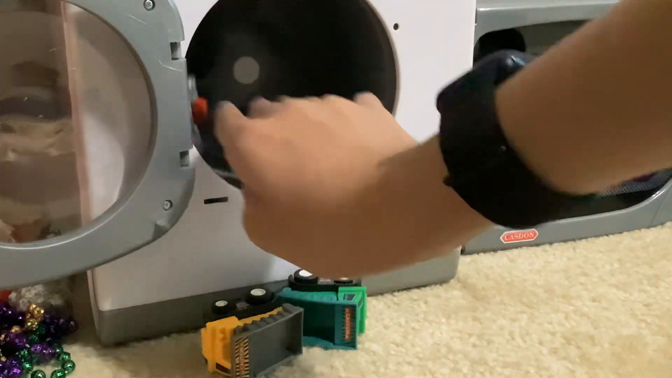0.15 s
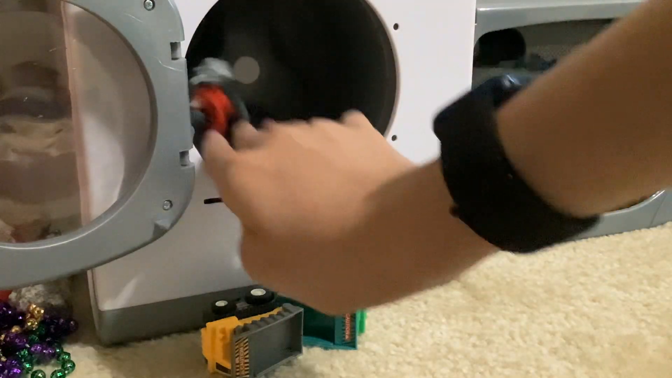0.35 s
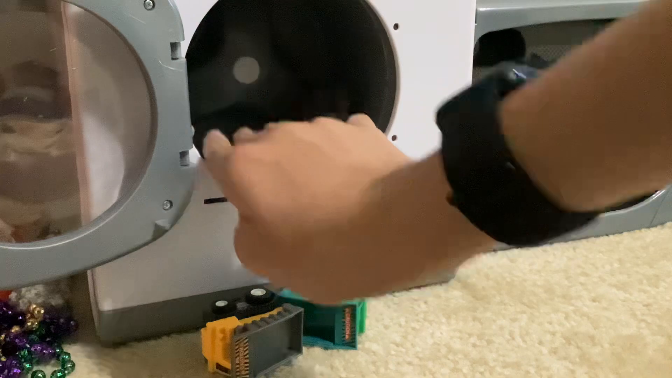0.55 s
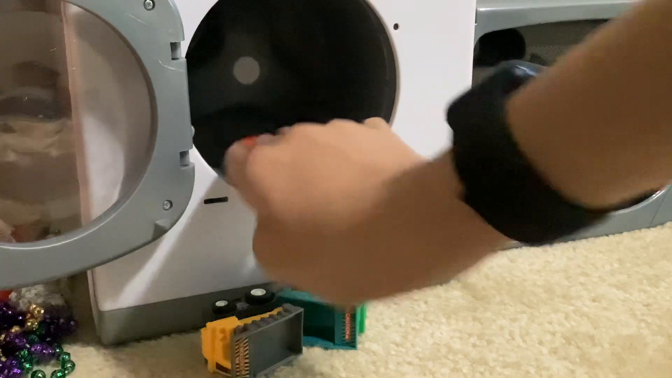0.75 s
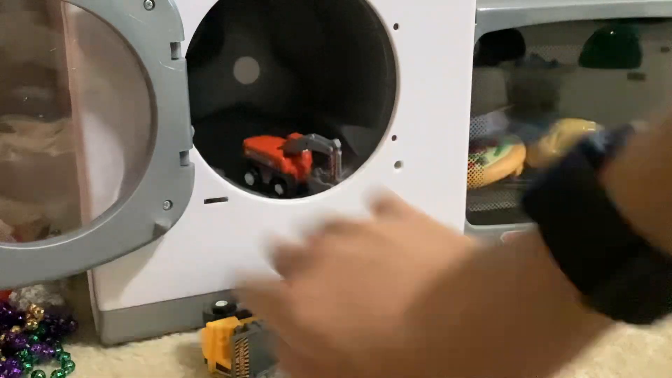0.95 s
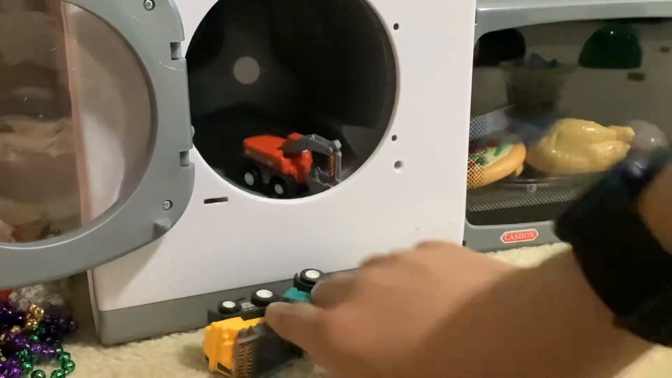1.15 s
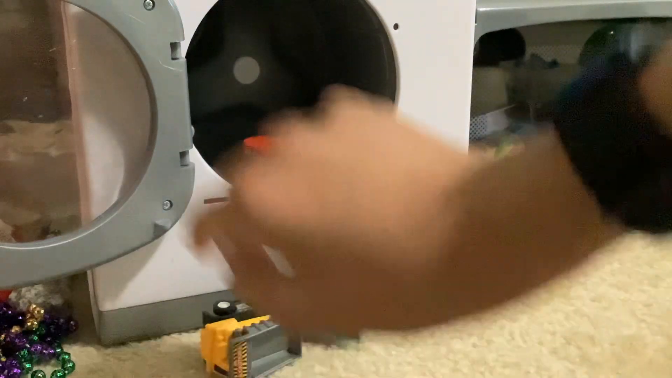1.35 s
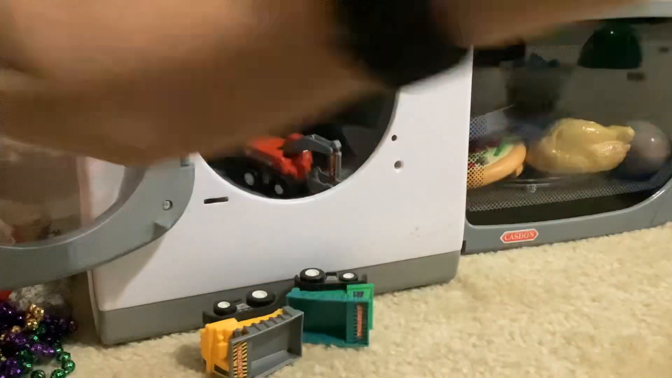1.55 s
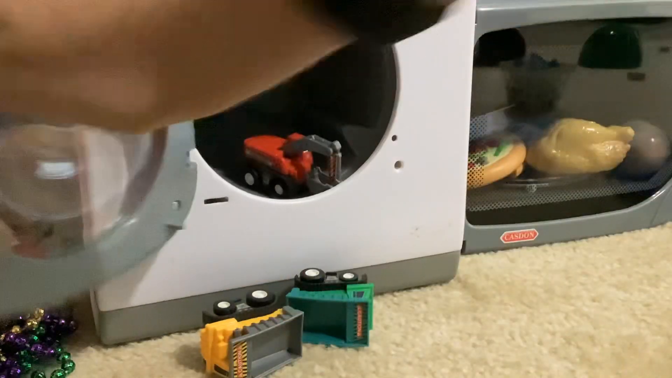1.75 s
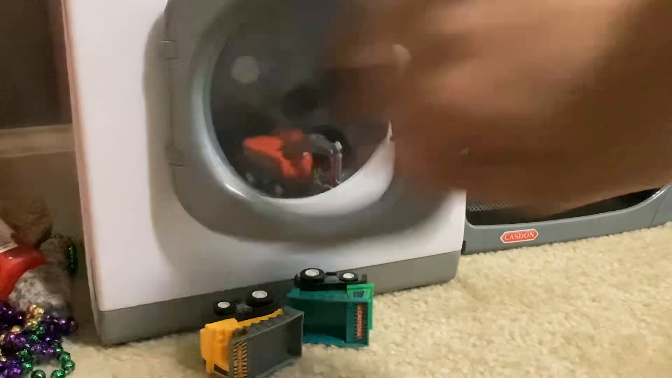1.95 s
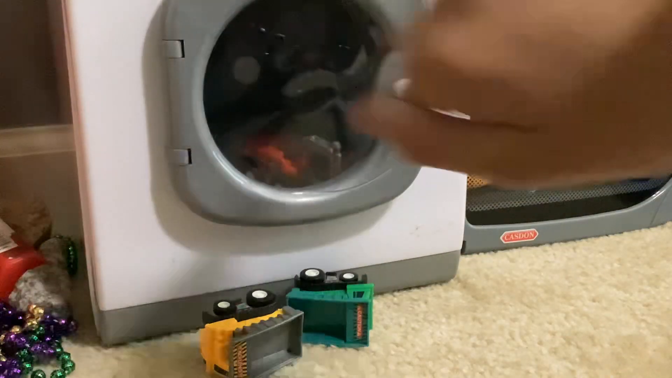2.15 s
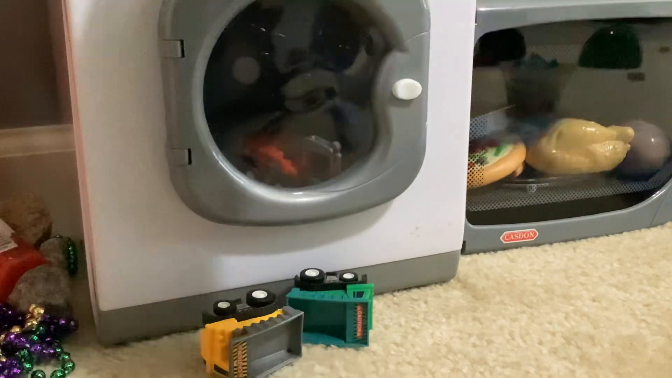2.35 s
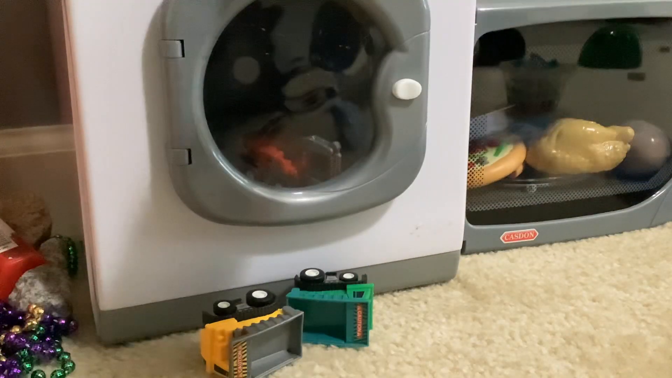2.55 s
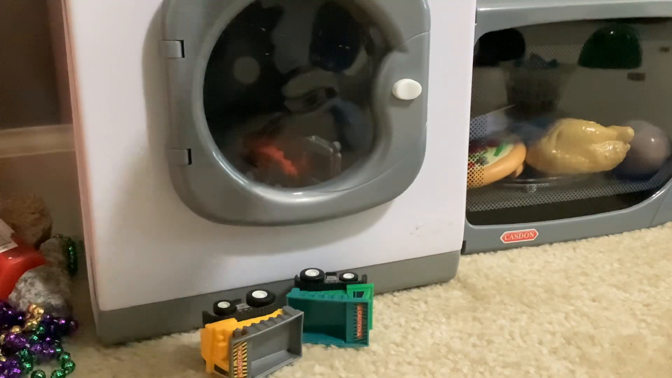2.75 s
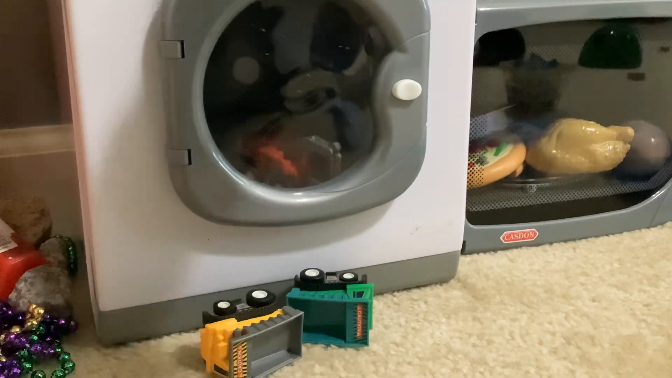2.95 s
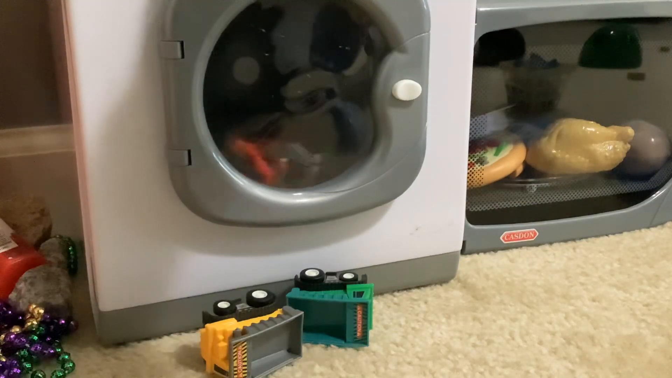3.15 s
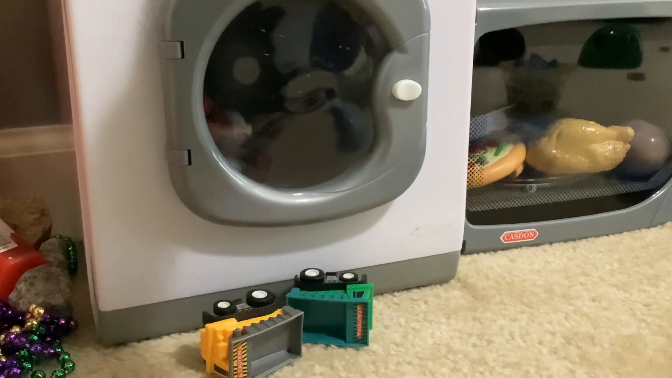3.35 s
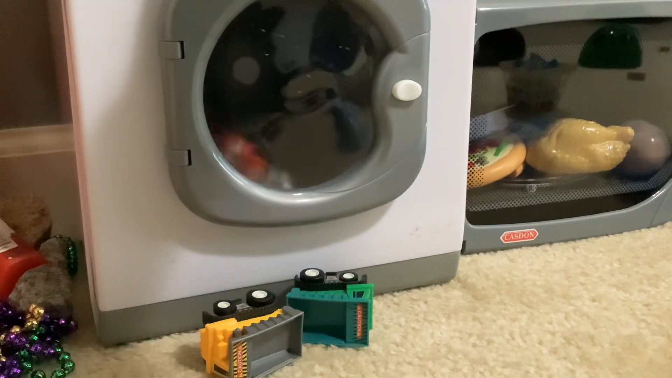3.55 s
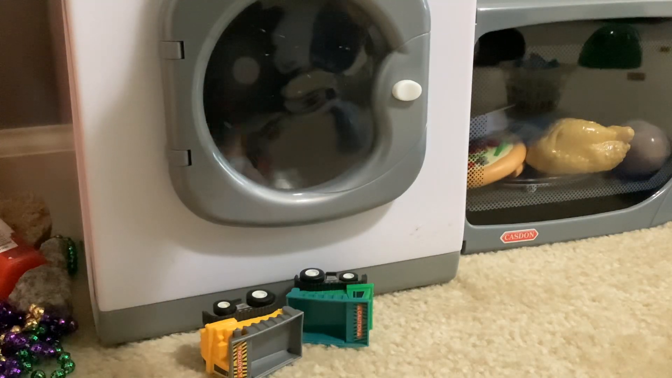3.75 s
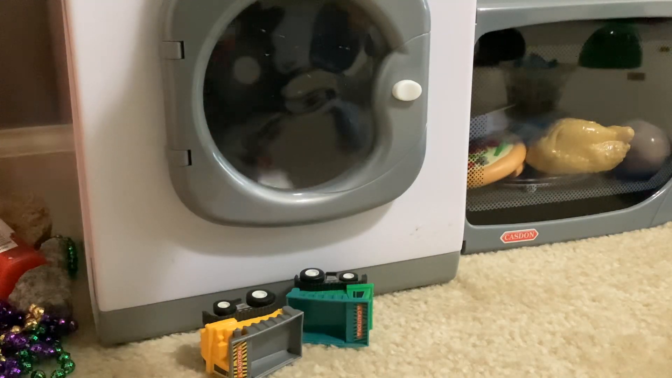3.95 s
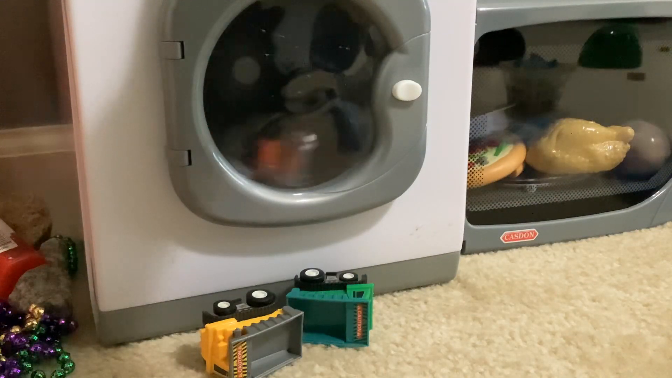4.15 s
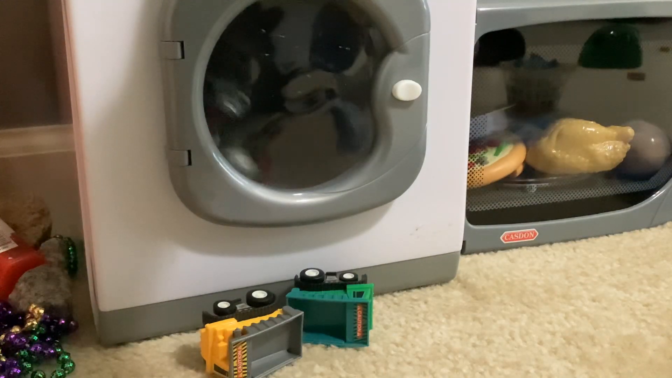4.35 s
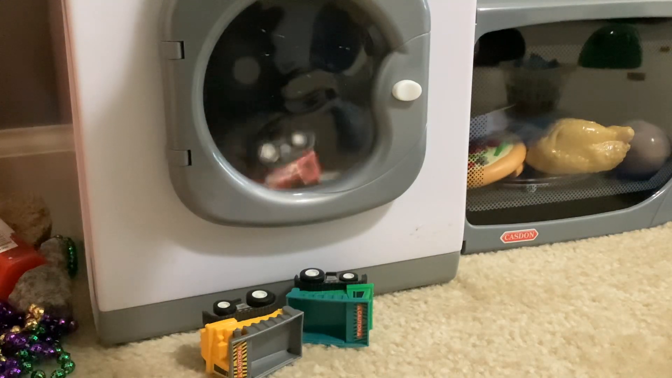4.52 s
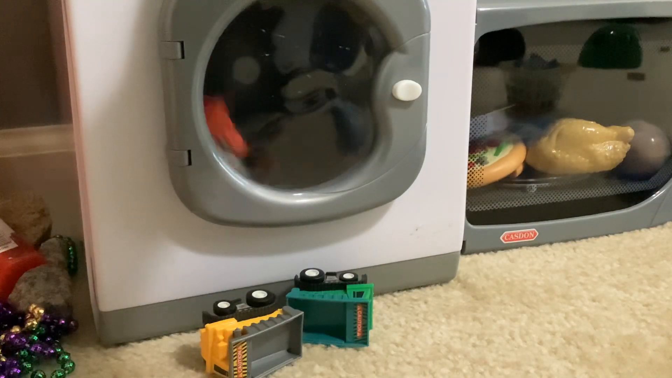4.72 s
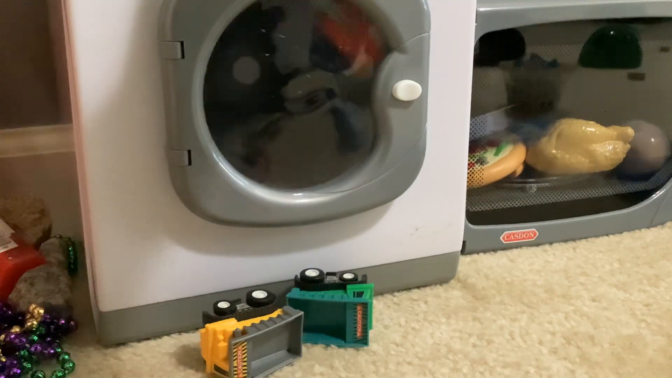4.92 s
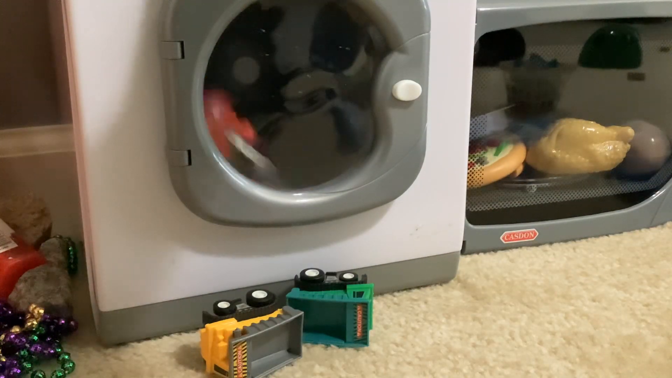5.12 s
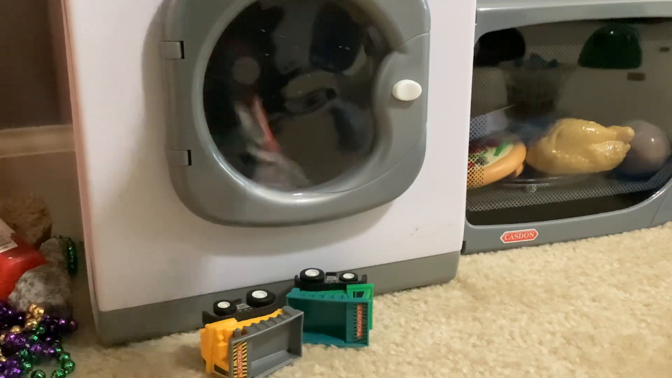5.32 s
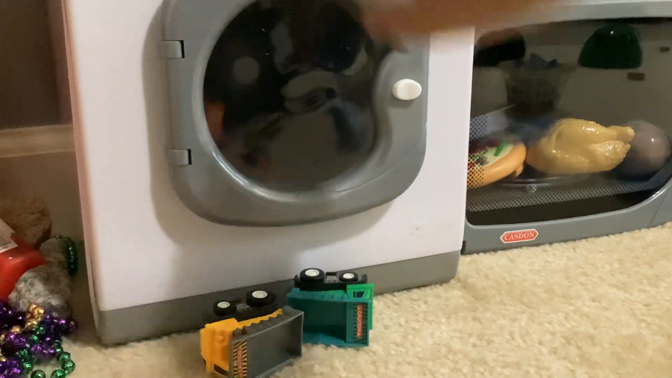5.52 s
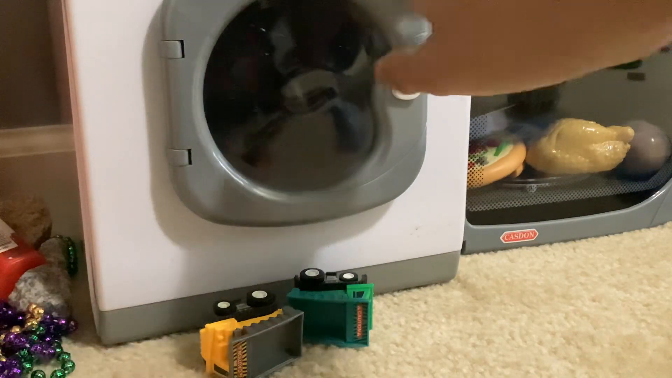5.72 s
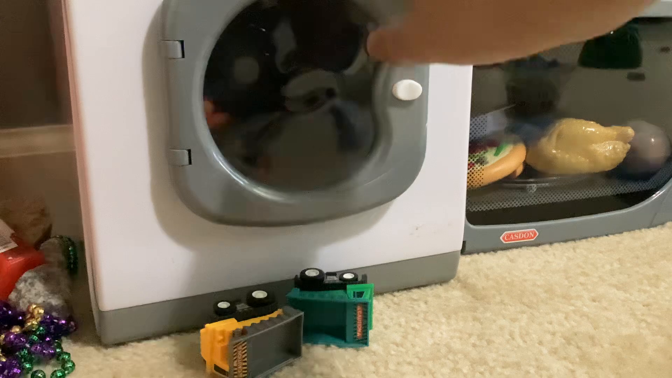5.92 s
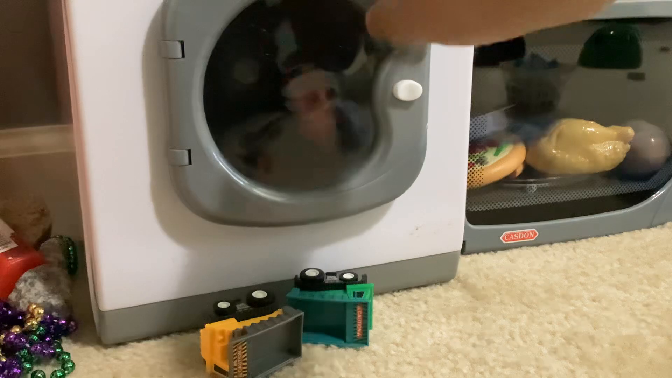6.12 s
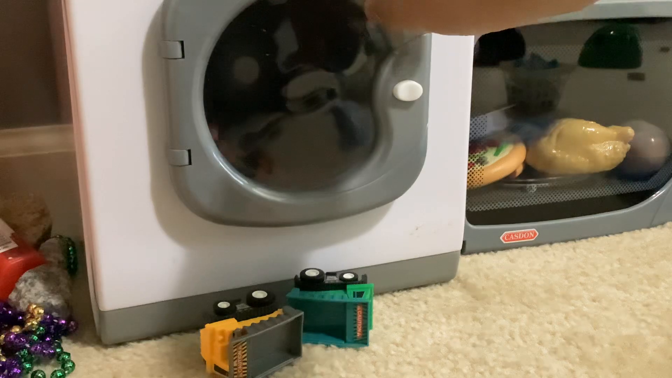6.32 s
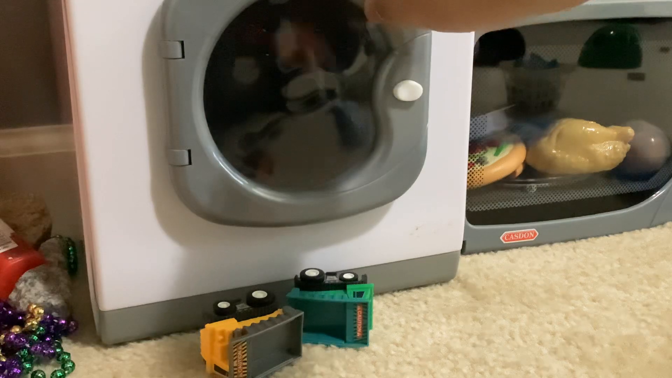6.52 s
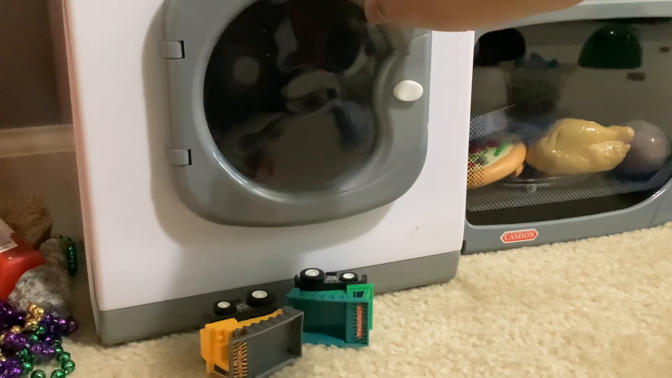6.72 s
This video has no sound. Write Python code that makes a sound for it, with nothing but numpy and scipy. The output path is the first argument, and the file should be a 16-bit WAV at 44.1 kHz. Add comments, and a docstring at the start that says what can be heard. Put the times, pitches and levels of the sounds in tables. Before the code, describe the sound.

A close microphone in a quiet, furnished room with a short soft tail and a faint low hum. From 0 to 0.85 s a small hard plastic toy car knocks in a hollow drum, strongest at the very start and near 0.1 and 0.5 s, with a fading hand rustle. From 1 to 1.4 s there are only tiny taps, ending in a slightly stronger one. At 1.63 s the door is bumped; a faint squeak grows as it swings, and it slams at about 2.0 s with a bright clack and boxy thud. Small ticks follow at 2.5 to 2.85 s. A button clicks at 2.98 s, a motor faintly whirrs, and at 3.18 s its gears catch into a steady, buzzing grind. From 3.4 s the car tumbles in irregular rattling clacks and hollow thumps, denser around 5.4 s and loud near 6 and 6.6 s, still running at the end.

```python
"""Hard plastic clacks come first: close to the microphone, a toy car knocks in the drum of a toy washing machine.
Fingers, door, latch and button tap the casing, with a rustling hand and a faint squeak; the door lands with a thud.
A motor whirrs faintly, then its gears catch; the car tumbles again, each blow a rattle of damped plastic modes.
Thuds push the modes of the hollow cabinet. A quiet furnished room answers with a decaying noise tail,
and shaped noise with steady low tones lies underneath. Table levels are relative dB, ahead of the layer gains."""
import sys
import numpy as np
from scipy import signal
from scipy.fft import rfft, irfft
from scipy.io import wavfile
from scipy.ndimage import uniform_filter1d

SR = 44100
rng = np.random.default_rng(int(sys.argv[2]) if len(sys.argv) > 2 else 0)


def digitize_waveform(pressure):
    """Quantize a signal to 16-bit integers and store it at the path in sys.argv[1].

    Rows of a 2-D input are taken as channels; values are limited to [-1, 1].
    """
    field = np.atleast_2d(pressure).T
    bounded = np.clip(field, -1, 1)
    quanta = np.round(bounded * 32767).astype(np.int16)
    wavfile.write(sys.argv[1], SR, quanta)


N = 298998  # samples

# Resonances of the car and drum wall when knocked: (frequency [Hz], level [dB], t60 [s])
PLASTIC_MODES = [(1070, -17, .065), (1460, -4, .032), (1620, -8, .022), (1900, -7, .02), (2270, -1, .022),
                 (2600, -2, .018), (2910, -5, .015), (3400, -8, .014), (4050, -5, .018), (4450, -7, .015),
                 (5120, -4, .014), (5800, -6, .014), (7000, -9, .006)]
# Resonances of the hollow cabinet: (frequency [Hz], level [dB], t60 [s])
CABINET_MODES = [(128, -7, .05), (170, -2, .055), (205, -1, .045), (235, -2, .04), (285, -8, .03),
                 (335, -9, .025), (388, -2, .038), (440, -3, .028), (505, 0, .028), (570, -4, .022),
                 (640, -5, .022)]

RISE_SHARE = .3  # rise time of a burst, as a share of its decay time


def undb(db):
    """Decibels to gain."""
    return 10 ** (np.asarray(db) / 20)


def unit(x):
    """Scaled to rms 1."""
    return x / np.sqrt(np.mean(x ** 2))


def coloured(x, points):
    """x filtered by a (frequency [Hz], level [dB]) spectrum, interpolated along log frequency."""
    hz, db = np.transpose(points)
    bins = np.arange(1, len(x) // 2 + 2) * SR / len(x)
    gain = undb(np.interp(np.log(bins), np.log(hz), db))
    return irfft(rfft(x) * gain, len(x))


def ring(x, hz, t60):
    """One damped mode, a two-pole resonator; an impulse of 1 rings with amplitude near 1."""
    radius = np.exp(-np.log(1000) / (t60 * SR))
    angle = 2 * np.pi * hz / SR
    tiny = 1e-18  # keeps the filter state out of denormal numbers
    return signal.lfilter([0, radius * np.sin(angle)], [1, -2 * radius * np.cos(angle), radius ** 2], x + tiny)


def walk(rate):
    """Random levels held for 1 / rate seconds, smoothed twice; rms near 1."""
    hold = int(SR / rate)
    steps = np.repeat(rng.standard_normal(N // hold + 1), hold)
    return unit(uniform_filter1d(uniform_filter1d(steps, hold), hold)[:N])


def curves(table, off_db=-110):
    """Level columns of a (time [s], level [dB], ..) table as gains per sample, near silent outside it."""
    s, *columns = np.transpose(table)
    t = np.arange(N) / SR
    return [undb(np.interp(t, s, column, left=off_db, right=off_db)) for column in columns]


def grains(rate, spread_db):
    """Random impulses, about rate per second, of random sign, a few larger than the rest; rms 1."""
    chance = rng.random((3, N))
    present = chance[0] < rate / SR
    sign = np.sign(chance[1] - .5)
    size = undb(-spread_db * np.log(chance[2] + 0.078))
    return unit(present * sign * size)


def struck(force, modes, s, spot_hz, reach_oct, far_share, scatter_db):
    """Force into a set of modes; every blow lands elsewhere and favours the modes near its own ring."""
    latest = np.maximum(np.searchsorted(s, np.arange(N) / SR) - 1, 0)
    away = np.log2(np.array(modes)[:, 0] / spot_hz[:, None]) / reach_oct
    weight = far_share + np.exp(-away ** 2)
    weight = weight * undb(scatter_db * rng.standard_normal(away.shape))
    weight /= np.sqrt(np.mean(weight ** 2, axis=1, keepdims=True))
    out = 0
    for k, (hz, db, t60) in enumerate(modes):
        out = out + (-1) ** k * undb(db) * ring(force * weight[latest, k], hz, t60)
    return out


def chorus(force, modes, flicker_db, rate):
    """A steady force through modes of alternating sign, each flickering in level alone; rms 1."""
    out = 0
    for k, (hz, db, t60) in enumerate(modes):
        level = undb(db + flicker_db * walk(rate))
        out = out + (-1) ** k * level * unit(ring(force, hz, t60))
    return unit(out)


def bursts(s, db, decay_s, rise_share):
    """Envelopes that jump up and die away; short contacts push harder for the same peak."""
    out = np.zeros(N + SR)
    t = np.arange(SR // 8) / SR
    for start, gain, tau in zip(s, undb(db), np.maximum(decay_s, .0005)):
        i = max(int(start * SR), 0)
        shape = np.exp(-t / tau) * (1 - np.exp(-t / (rise_share * tau)))
        out[i:i + len(t)] += gain * shape / np.sqrt(tau * SR)
    return out[:N]


def rattle(table, modes, crunch_colour):
    """Each blow is a quick rattle of contacts: a ringing clack, a broad crunch and a dry treble crack."""
    s, clack_db, spot_hz, crack_db, decay_ms = np.transpose(table)
    contacts = grains(9000, 2.9) * bursts(s, clack_db, decay_ms / 1000, RISE_SHARE)
    clack = struck(contacts, modes, s, spot_hz, reach_oct=.35, far_share=.4, scatter_db=3)
    crunch = coloured(contacts, crunch_colour)
    crack = grains(14000, 5.5) * bursts(s, clack_db + crack_db, decay_ms / 1000, RISE_SHARE)
    crack = coloured(crack, [(2500, -10.0), (4500, -3.0), (8000, -8.5), (11000, -19.0), (16000, -32.5)])
    return undb(-2.5) * clack + undb(8.0) * crunch + undb(28.5) * crack


def car_knocks():
    """The car strikes the drum, exciting the plastic modes of both."""
    # Blows: (time [s], clack [dB], favoured ring [Hz], crack relative to clack [dB], rattle decay time [ms])
    blows = [(.002, -5, 2440, -3, 5.1), (.01, -1, 3070, -28, 2.8), (.0962, -7.5, 4300, 0.5, 4.4),
             (.3316, -28.5, 1080, -18, 3), (.347, -34, 3200, -8, 2.8), (.3805, -32, 4840, 1.5, 2.2),
             (.3985, -18, 2200, 8.5, 5.3), (.4249, -20, 2550, -6, 3.7), (.4519, -11.5, 5350, -4, 4),
             (.4624, -20, 2380, 7.5, 3.2), (.4744, -28, 2280, 9, 2.6), (.5167, -5.5, 2840, -8.5, 4.3),
             (.595, -17, 1980, -2, 5.8), (.6784, -20.5, 2400, -0.5, 7.9), (.7412, -14, 5400, -17, 4),
             (.7672, -8, 4680, -8.5, 3.1), (.7941, -26, 1040, -2.5, 0.98), (.849, -22.5, 1830, -14, 2.4),
             (3.3558, -25, 1475, -1.5, 3.3), (3.4265, -6, 2550, -7.5, 6.6), (3.5153, -15, 2870, 0.5, 10.5),
             (3.5666, -2, 1880, -7.5, 7.2), (3.5986, -12.5, 2350, -26, 6.8),
             (3.7088, -10.5, 2280, -32, 7.4), (3.7288, -12.5, 2420, 1.5, 9.3), (3.7602, -8, 4970, -11, 7.9),
             (3.7806, -9.5, 1480, -2, 11), (3.8056, -7, 3370, -1, 7.2), (4.0206, -14.5, 2270, -7.5, 6),
             (4.0924, -11, 2480, 0, 14), (4.1174, -13, 2510, 6, 4.8), (4.2182, -10.5, 2270, -36, 5),
             (4.3364, -14, 1590, 5.5, 3.5), (4.3918, -7.5, 1900, -0.5, 19.4), (4.5289, -5.5, 3180, -1, 7.7),
             (4.5559, -7, 1650, -8.5, 2.9), (4.6242, -13, 2270, -32, 5.7), (4.6841, -13, 2170, -9, 8.1),
             (4.6956, -11, 2540, -6.5, 37), (4.765, -25, 5100, 7, 2.2), (4.8133, -17, 2250, -20, 15),
             (4.915, -22, 5100, 1, 25), (4.944, -14.5, 2180, -9, 16), (5.0602, -14, 1970, -12, 7.3),
             (5.0712, -20, 2270, -11, 5.5), (5.2044, -11.5, 2120, -14, 16), (5.2398, -18.5, 2320, 2, 6.4),
             (5.2787, -6, 2700, -7, 11), (5.3077, -8.5, 1730, -27, 6.2), (5.3301, -11, 1570, -5, 31),
             (5.38, -12, 2090, -21, 2.6), (5.3985, -15, 1430, -2, 2.3), (5.4299, -14.5, 4160, 14, 7.6),
             (5.4424, -11.5, 2270, -12, 14), (5.6579, -17.5, 2310, -19, 5.4), (5.7357, -16, 5130, 7.5, 11),
             (5.7532, -8, 2880, 0, 11), (5.7806, -3, 1200, -9.5, 3.7), (5.804, -14.5, 2240, -4, 20),
             (5.9737, 0, 1650, -11.5, 9.7), (6.1478, -15, 4450, 12.5, 5.9), (6.1597, -7.5, 2500, 4.5, 2.9),
             (6.1867, -10, 5230, 3.5, 7), (6.2116, -7, 2380, -4.5, 22), (6.284, -8, 2940, -5.5, 50),
             (6.3588, -9, 1950, 1.5, 10.7), (6.4077, -12, 2550, -21, 9.2), (6.5454, -9.5, 3720, -7.5, 13),
             (6.5883, -8.5, 1790, 1, 8.6), (6.615, -12, 2270, -29, 9.5), (6.6322, -3.5, 2280, -1, 9.5),
             (6.6494, -12, 2380, -26, 8.5), (6.7449, -16.5, 4230, -1.5, 6.9)]
    # Crunch spectrum: (frequency [Hz], level [dB])
    crunch_colour = [(300, -36.5), (1000, -11), (1500, 7.5), (2500, -5.5), (5000, -12), (9000, -18.5)]
    return rattle(blows, PLASTIC_MODES, crunch_colour)


def handling():
    """Grainy rustle of skin and cloth, and a dull shuffle carried by the cabinet's lowest modes."""
    # Hand and sleeve brushing about, the door swinging: (time [s], rustle [dB], low shuffle [dB])
    brushing = [(0, -29.5, -38), (.25, -59, -57), (.45, -76.5, -47), (.9, -66, -51), (1.05, -75.5, -69),
                (1.3, -76, -79), (1.6, -87, -78), (1.66, -55.5, -32), (1.76, -70, -59), (1.86, -58.5, -68),
                (1.95, -59, -44.5), (2.1, -43.5, -62), (2.34, -73, -75), (2.62, -85, -53.5),
                (2.73, -88, -51.5), (2.985, -83, -69)]
    # Rustle spectrum: (frequency [Hz], level [dB])
    rustle_colour = [(600, -10.5), (1200, -6.5), (2300, -1), (3200, -9), (5000, -6), (8000, -14),
                     (15000, -35.5)]
    rustle, shuffle = curves(brushing)
    skin = coloured(grains(6000, 3) * undb(2.5 * walk(30)), rustle_colour)
    low_modes = [mode for mode in CABINET_MODES if mode[0] < 250]
    return rustle * unit(skin) + shuffle * chorus(rng.standard_normal(N), low_modes, 3, 12)


def thuds():
    """One hard push, then a brief shudder, into the hollow cabinet; its panels add a short, dull, broad slap."""
    # Weight landing on drum or casing: (time [s], level [dB], favoured ring [Hz])
    landings = [(.004, -18, 393), (0.078, -23, 170), (0.402, -30, 190), (.428, -23, 398), (0.45, -23, 390),
                (0.594, -32, 186), (0.848, -26.5, 194), (1.389, -28, 223), (1.641, -21.5, 202),
                (1.933, -26.5, 159), (1.982, -9.5, 198), (2.005, 2, 266), (2.079, -21, 234),
                (2.513, -33.5, 397), (2.528, -34, 179.6), (2.987, -22.5, 215), (3.432, -13, 524),
                (3.526, -24, 484), (3.571, -14.5, 430), (3.823, -12.5, 484), (4.104, -10.5, 500),
                (4.128, -20, 150), (4.341, -11.5, 500), (4.392, -19.5, 418), (4.561, -10, 384),
                (4.691, -22, 430), (4.738, -13, 455), (5.214, -17.5, 480), (5.278, -11.5, 523),
                (5.328, -14, 236), (5.403, -6.5, 337), (5.443, -4.5, 420), (5.533, -12, 503),
                (5.67, -23, 420), (5.78, -5.5, 513), (5.943, -21, 196), (5.984, -14.5, 544),
                (6.024, -12, 298), (6.159, -9.5, 543), (6.225, -15.5, 490), (6.347, -14, 219),
                (6.589, -5.5, 460), (6.655, -24.5, 184)]
    shudder_db, shudder_decay_s = 4, .013
    s, db, spot_hz = np.transpose(landings)
    decay_s = np.full(len(s), shudder_decay_s)
    push = undb(shudder_db) * rng.standard_normal(N) * bursts(s, db, decay_s, RISE_SHARE)
    push[(s * SR).astype(int) + 1] += undb(db)
    slap = coloured(push, [(60, -35), (150, -20.5), (350, -12), (800, 2.5), (1400, -4), (3000, -25.5)])
    boom = struck(push, CABINET_MODES, s, spot_hz, reach_oct=0.4, far_share=.35, scatter_db=3)
    return undb(-4) * boom + undb(17.5) * slap


def room(x):
    """Diffuse tail, built by octaves, in which the bass lingers; things move, so three paths take turns."""
    # Reverberation time: (frequency [Hz], t60 [s])
    decay_table = [(150, 0.57), (500, 0.29), (2000, 0.27), (6000, 0.26), (14000, 0.27)]
    level_db, path_cycle_s = -10.5, .047
    t = np.arange(SR // 2) / SR
    paths = np.arange(3)[:, None]
    decay_hz, decay_t60 = np.transpose(decay_table)
    tails = 0
    for hz in 90 * 2. ** np.arange(8):
        t60 = np.interp(np.log(hz), np.log(decay_hz), decay_t60)
        octave = signal.butter(2, [hz / np.sqrt(2), hz * np.sqrt(2)], "band", fs=SR, output="sos")
        band = signal.sosfilt(octave, rng.standard_normal((len(paths), len(t))))
        tails = tails + band * undb(-60 * t / t60)
    tails = tails * (1 - np.exp(-t / 0.00067))  # soft onset
    tails = tails / np.sqrt(np.sum(tails ** 2, axis=1, keepdims=True))
    share = np.cos(np.pi * (np.arange(N) / SR / path_cycle_s - paths / len(paths))) ** 4
    share = share / np.sqrt(np.sum(share ** 2, axis=0))  # the same total power at every moment
    return undb(level_db) * signal.fftconvolve(x * share, tails, axes=1)[:, :N].sum(axis=0)


def background():
    """Quiet air as shaped noise, with steady sine tones of the house."""
    # Air spectrum: (frequency [Hz], level [dB])
    air_colour = [(30, -27.5), (45, -5), (60, 5.5), (85, -6), (160, 3.5), (400, -18), (1200, -38.5),
                  (5000, -48.5), (16000, -54.5)]
    # Low tones: (frequency [Hz], rms level [dB])
    tones = [(58, -68), (80, -71.5)]
    out = undb(-66.5) * unit(coloured(rng.standard_normal(N), air_colour))
    t = np.arange(N) / SR
    for hz, db in tones:
        out = out + np.sqrt(2) * undb(db) * np.sin(2 * np.pi * hz * t)
    return out


def casing_taps():
    """Fingers, door, latch and button strike the casing, whose modes are dull and broad."""
    # Taps: (time [s], clack [dB], favoured ring [Hz], crack relative to clack [dB], rattle decay time [ms])
    blows = [(1.0048, -49, 5470, 14, 14), (1.0339, -46.5, 5200, -13, 2.8), (1.0495, -45.5, 6050, 10, 5),
             (1.0694, -44.5, 5270, 3, 5.9), (1.1453, -50.5, 3460, 2, 5), (1.1697, -52, 5080, -4, 3.3),
             (1.2103, -45, 3600, 10, 6.8), (1.2744, -54.5, 5260, -2, 5), (1.3144, -54, 5530, -2, 2.7),
             (1.361, -48.5, 2980, 16, 4), (1.3734, -40, 5030, 9, 2.5), (1.386, -17, 720, -9.5, 7.2),
             (1.4144, -53, 4720, 0, 3), (1.6269, -16.5, 1770, -9.5, 17), (1.8788, -22.5, 2140, -27.5, 8.8),
             (1.9132, -28, 2070, -37, 9.4), (1.9586, -25.5, 1350, -32, 11), (1.977, -3.5, 2250, -11.5, 30),
             (2, 2, 1460, -7, 6.3), (2.5078, -41, 2200, -8, 5), (2.5256, -39, 5570, -14, 1.1),
             (2.66, -33, 4360, 0, 6.1), (2.7011, -27, 2080, -4, 3.7), (2.772, -46.5, 1770, -15, 3.6),
             (2.8007, -48.5, 3200, 3.5, 2.6), (2.84, -41.5, 964, -9.5, 1.9), (2.9831, -17, 2630, -23, 6.5)]
    # Resonances of door and casing: (frequency [Hz], level [dB], t60 [s])
    modes = [(544, 7, 0.011), (850, 7.5, 0.0014), (1795, 5.5, 0.0075), (2010, 8, 0.0029),
             (3360, -3.5, 0.017), (3400, -17.5, 0.011), (5500, 5, 0.006)]
    # Crunch spectrum: (frequency [Hz], level [dB])
    crunch_colour = [(200, -23.5), (700, -1.5), (1500, 13.5), (3000, 3.5), (6000, -18), (9000, -27.5)]
    return rattle(blows, modes, crunch_colour)


def hinge():
    """A faint stick-slip squeak: irregular impulses ring one mode."""
    # The squeak grows as the door swings: (time [s], level [dB])
    swing = [(1.72, -70), (1.88, -58)]
    return curves(swing)[0] * unit(ring(grains(1500, 2.5), hz=2480, t60=.02))


def motor():
    """Gear teeth mesh unevenly and ring the gearbox, while brushes hiss; the level leaps as the gears catch."""
    # Resonances of the gearbox: (frequency [Hz], level [dB], t60 [s])
    gearbox_modes = [(440, -4, 0.048), (934.4, -4, 0.029), (1580, -0.5, 0.0036), (1830, -0.5, 0.015),
                     (2203, -1, 0.041), (2620, 0.5, 0.0025), (3434, -14, 0.011), (6700, -27, 0.0076)]
    switch_s, catch_s, bite_s = 2.99, 3.176, .008
    start_db, wound_db, run_db = -52, -62.5, -36.5
    (whirr,) = curves([(switch_s, start_db), (catch_s, wound_db),
                       (catch_s + bite_s, run_db), (N / SR, run_db)])
    gears = chorus(grains(1500, 3.5) * undb(2 * walk(80)), gearbox_modes, 1.8, 45)
    hiss = coloured(grains(4200, 2.5), [(2500, -11.0), (5000, 8.5), (9000, -6.5), (16000, -32)])
    brushes = undb(-23) * unit(hiss)
    return whirr * (gears + brushes)


def turning_drum():
    """Noise rumbles through the cabinet modes; light, uneven contacts make the car jitter between knocks."""
    # The loaded drum turning: (time [s], rumble through the cabinet [dB], jitter of the car [dB])
    turning = [(3.02, -69, -82), (3.1, -44, -79.5), (3.34, -50, -45.5), (3.62, -39, -37),
               (4.11, -47, -39.5), (4.62, -32.5, -32), (4.97, -39.5, -39.5), (5.22, -35.5, -39.5),
               (5.42, -31, -25.5), (5.72, -42.5, -40.5), (6.78, -39.5, -35.5)]
    tilt_db_oct = -3  # light contacts stir the high modes less
    ring_share = .55  # of the t60 of a knock
    rumble, shake = curves(turning)
    drum = chorus(rng.standard_normal(N), CABINET_MODES, 2.9, 14)
    jitter = grains(1000, 4) * undb(3.5 * walk(60) + 1.5 * walk(12))
    light_modes = [(hz, db + tilt_db_oct * np.log2(hz / 1000), ring_share * t60)
                   for hz, db, t60 in PLASTIC_MODES]
    car = chorus(jitter, light_modes, 1.3, 30)
    hiss = coloured(jitter, [(2000, -4.0), (3500, 4), (6000, -17.5), (9000, -7.0), (16000, -28.5)])
    return rumble * drum + shake * (car + 0.3 * unit(hiss))


def scene():
    """Blows and their room tail over hand and machine; the microphone hears little deep bass but the hum."""
    hits = car_knocks() + thuds() + casing_taps()
    near = hits + room(hits) + handling() + hinge() + motor() + turning_drum()
    low_cut = signal.butter(3, 93, "high", fs=SR, output="sos")
    return (signal.sosfilt(low_cut, near) + background())[None]


def record(dry):
    """The microphone channel rounds the loudest peaks and cuts the top."""
    rounded = np.tanh(0.83 * dry) / 0.76
    top_cut = signal.ellip(10, .3, 70, 16200, fs=SR, output="sos")
    return signal.sosfilt(top_cut, rounded)


dry = scene()
out = record(dry)
digitize_waveform(out)
```